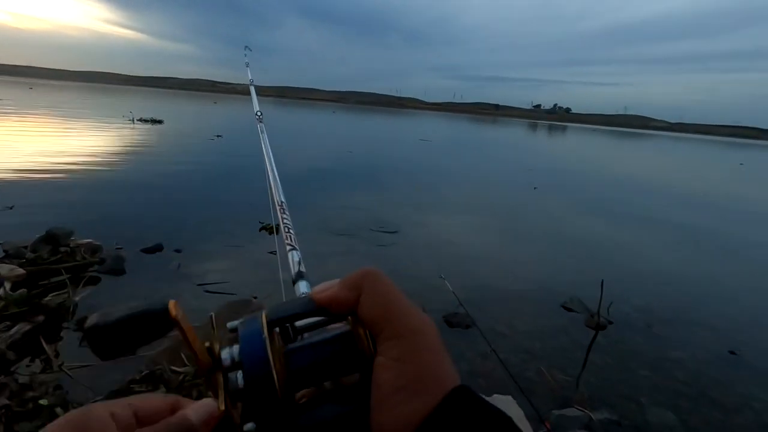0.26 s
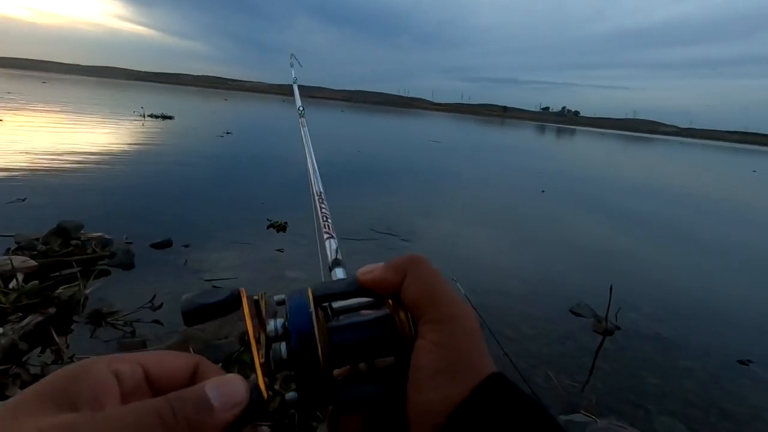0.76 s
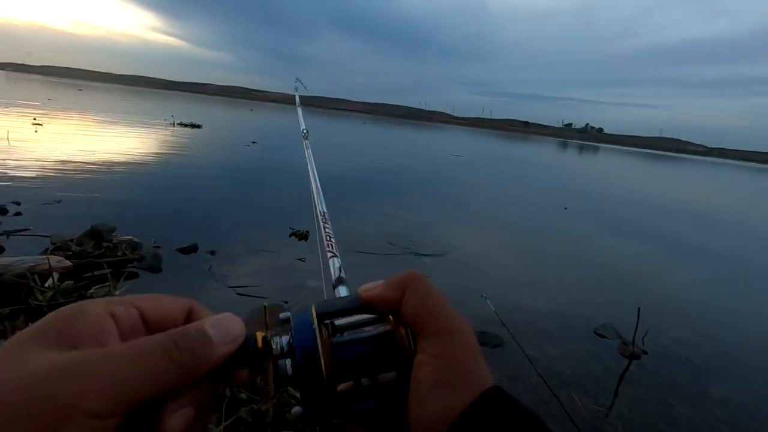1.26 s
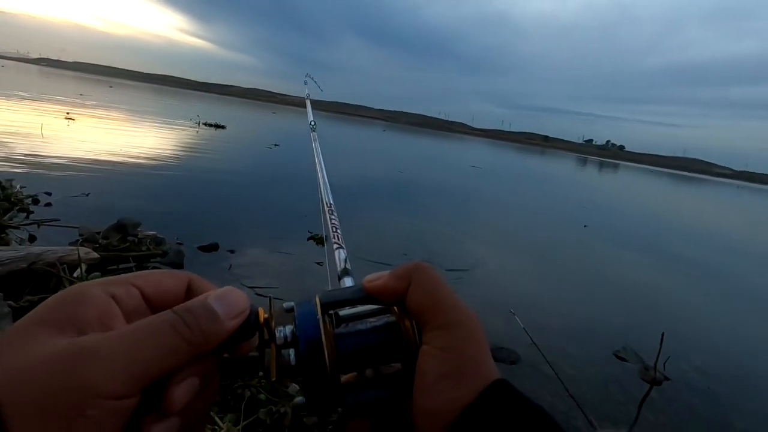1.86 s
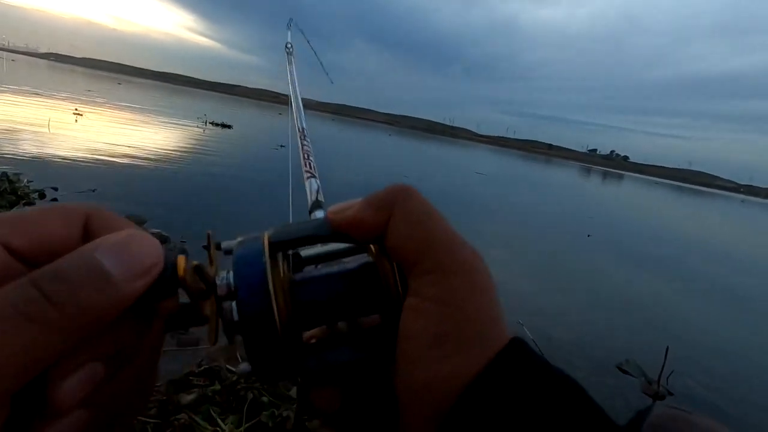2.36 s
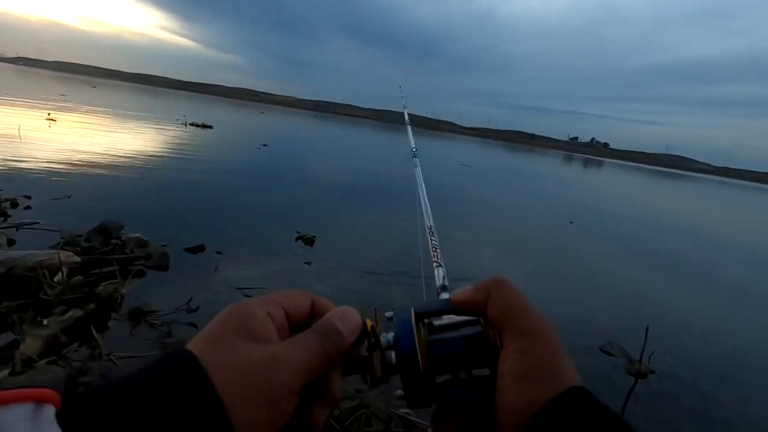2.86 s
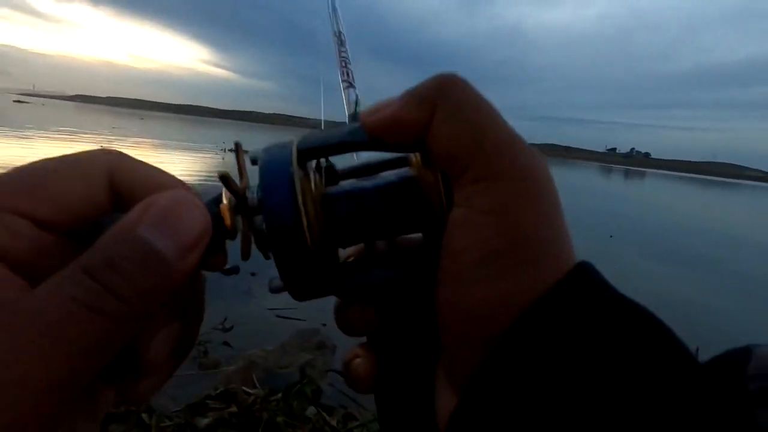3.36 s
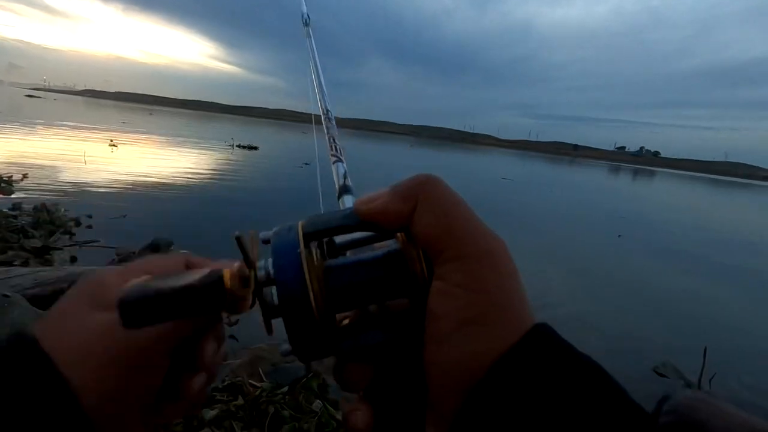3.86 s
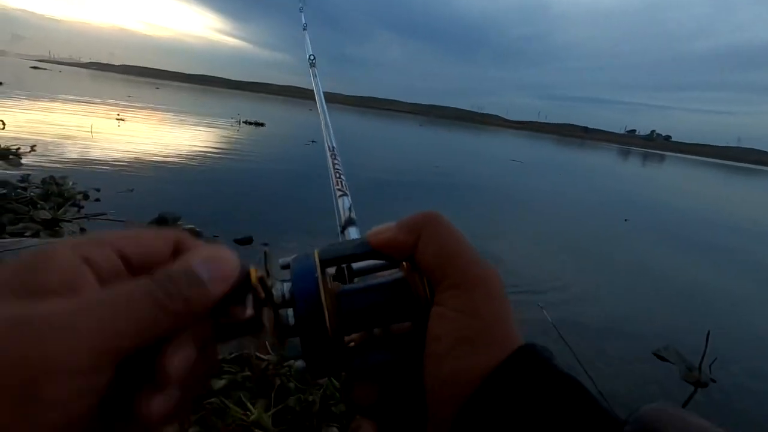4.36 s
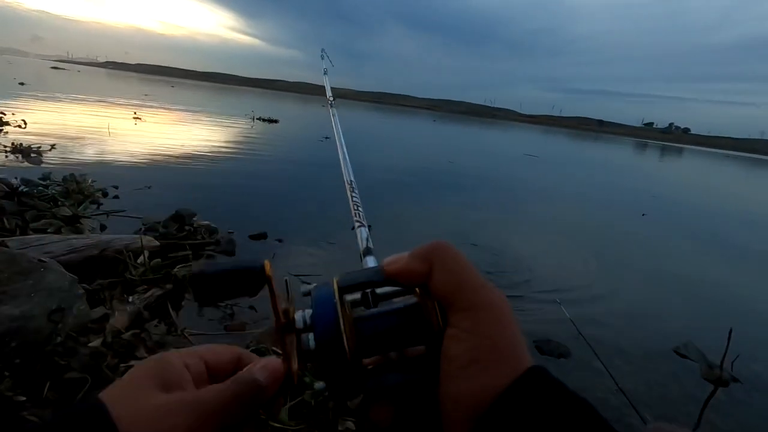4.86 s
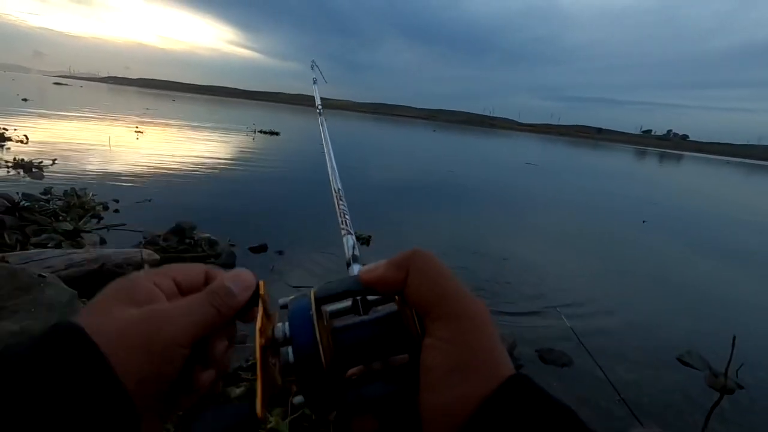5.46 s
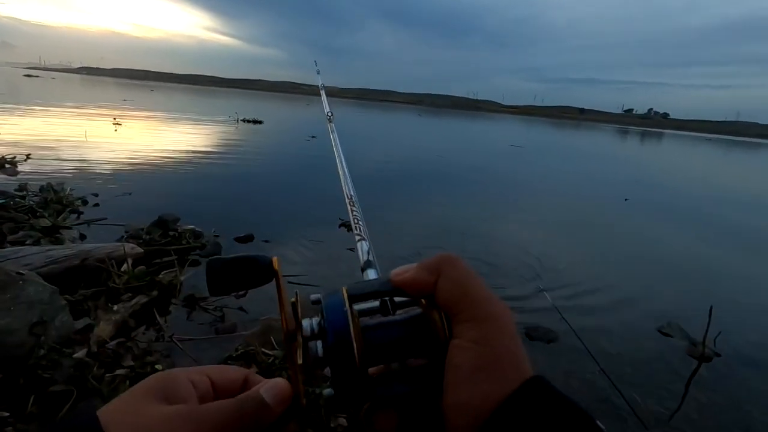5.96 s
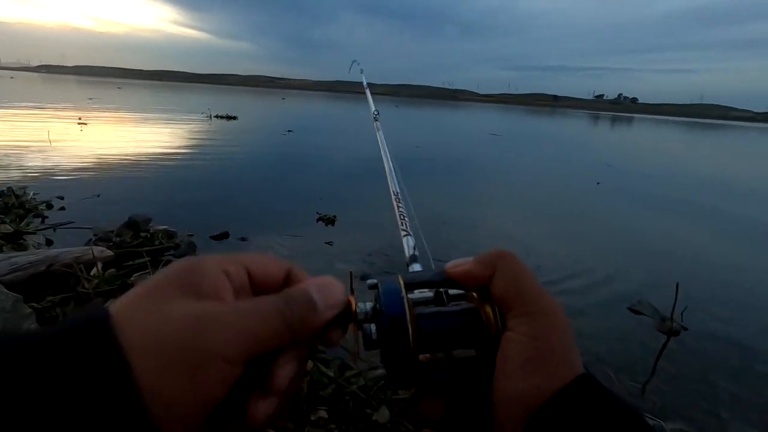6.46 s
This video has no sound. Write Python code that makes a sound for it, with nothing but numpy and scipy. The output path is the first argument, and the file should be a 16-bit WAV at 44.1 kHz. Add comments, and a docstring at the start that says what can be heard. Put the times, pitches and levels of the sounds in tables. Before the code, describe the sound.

Very close to the microphone, a fishing reel is cranked in short bursts, its metal clicker buzzing crisply with a faint gear whir. After two early turns and a short third, only stray clicks and hand knocks remain, then a cluster of fumbling knocks leads into quick repeated bursts. Far across open water an engine climbs through two gears and settles, over a low drone, soft wash and light wind buffeting.

```python
"""A baitcasting reel is cranked in short bursts on a calm lake shore, close to the microphone.
Its clicker pawl scrapes up each ratchet tooth and snaps off, singly when slow and as a buzz when fast,
ringing tuned reel modes and its own spring. Noise makes the gear whir, after-ring and sleeve rustle;
hands knock in short damped notes and creak in tiny slips. Far off, harmonics make an engine that pulls
through two gears and settles, two tones a drone, over air rumble and wash; a breeze buffets the mic."""
import sys
import numpy as np
from scipy import signal
from scipy.fft import rfft, irfft
from scipy.io import wavfile
from scipy.ndimage import uniform_filter1d, map_coordinates

SR = 44100
rng = np.random.default_rng(int(sys.argv[2]) if len(sys.argv) > 2 else 0)


def inscribe(sig):
    """Save sig as 16-bit PCM at rate SR to the path in sys.argv[1].

    A 1-D sig is mono; a 2-D sig holds one channel per row.
    Samples are clipped to [-1, 1] before scaling.
    """
    pcm = np.round(np.clip(np.atleast_2d(sig).T, -1, 1) * 32767)
    wavfile.write(sys.argv[1], SR, pcm.astype(np.int16))


N = 296352
TIME = np.arange(N) / SR

# spins of the crank: click level/dB, then rod ring, frame ring and top treble re click/dB,
# then the speed from first click to last as rows of (t/s, rate/teeth per s)
SPINS = [(-21, 2.3, 1, 1, [(.0116, 70), (.099, 68.6), (.274, 66.5), (.278, 61.5), (.41, 42.5)]),
         (-22, -2, 0, 0, [(.4784, 46), (.505, 66), (.535, 63), (.5977, 20)]),
         (-21.8, -.5, 2.5, -2, [(1.0806, 23.3), (1.144, 40.5), (1.186, 42.4), (1.2637, 15.4)]),
         (-19.5, 3, -1, 0, [(3.5785, 35.5), (3.681, 86), (3.739, 118), (3.839, 81), (3.8856, 44.6)]),
         (-20.3, 1.5, -1, 0, [(4.0676, 48), (4.098, 69.8), (4.152, 63.8), (4.294, 91.2), (4.367, 118.2),
         (4.45, 93.5), (4.5205, 24.8)]), (-20.8, 0, -2, 0, [(4.599, 45.6), (4.628, 79), (4.662, 70),
         (4.713, 121.5), (4.774, 55), (4.7986, 57)]), (-21, -2, 2, .5, [(4.8171, 73), (4.909, 56),
         (4.972, 70.6), (4.999, 59.4), (5.105, 86), (5.234, 73), (5.2957, 36.4)]),
         (-21, -3, -.5, 0, [(5.3625, 47), (5.44, 107.8), (5.489, 107.6), (5.533, 67.7), (5.609, 66.8),
         (5.6977, 41)]), (-21, .7, 2.2, -2, [(6.2371, 45.4), (6.343, 74), (6.377, 86.3), (6.457, 71.4),
         (6.5095, 29.4)])]
# single teeth slipping past while the crank creeps:
# t/s, click level/dB, then rod ring, frame ring and top treble re click/dB
LONE_CLICKS = [(0.448, -22.5, 3, 6, -6), (.647, -22, -4, 4.5, -7), (1.33, -25.5, 6, 6.5, 1),
               (1.533, -23.5, 4, -1, -4.5), (2.3094, -29, -5, 1.5, -1), (3.921, -21.5, -6, 2, 1.5),
               (3.982, -19.5, -5, -3, -1.5), (4.0368, -21, -1, 4, -3), (5.333, -21, 8, 3, -4),
               (5.7265, -19, 3, 1, -6), (5.766, -23, 3, 5.5, -0.5), (5.816, -22.5, 2, 1.5, 4.5),
               (5.9074, -21, -4, 0, 2), (6.2037, -22, -4.5, 4.5, -0.5), (6.5582, -25, 2, 7.5, 1),
               (6.627, -25.5, 5, 4.5, 1)]
# colour of skin scuffs and sleeve rustle: f/Hz, relative level/dB per Hz
CLOTH_COLOUR = [(1500, 16), (3500, 3), (6000, 2.5), (8000, -6.5), (10000, -21), (14000, -33)]

USUAL_TEETH_PER_S, WHEEL_TEETH = 66.4, 9
TREBLE_FROM_HZ = 8000   # modes above this change with each turn of the wheel


def from_db(db):
    """Decibels to gain."""
    return 10 ** (np.asarray(db) / 20)


def rms_one(x):
    """Scale to rms 1."""
    return x / np.sqrt(np.mean(x ** 2) + 1e-20)


def in_time(rows):
    """Each column of a curve at every sample."""
    s, *columns = np.transpose(rows)
    return [np.interp(TIME, s, c) for c in columns]


def at_hz(points, hz):
    """Read a spectrum on a log-frequency axis."""
    f, value = np.transpose(points)
    return np.interp(np.log(hz + 1), np.log(f), value)


def drift(rate):
    """Slow chance of spread 1, with the given number of random knots per second."""
    knots = rng.standard_normal(8000)
    return rms_one(map_coordinates(knots, [TIME * rate], order=3, mode="wrap"))


def tooth_by_tooth(shape, memory):
    """Chance of spread 1 that changes gradually from one tooth (first axis) to the next."""
    fresh = rng.standard_normal(shape)
    return np.sqrt(1 - memory ** 2) * signal.lfilter([1], [1, -memory], fresh, axis=0)


def noise(colour, size=N):
    """Stereo noise of a given colour and rms 1, alike in the bass and wide in the treble."""
    # left-right likeness: f/Hz, likeness 0-1
    likeness = [(25, 0.9), (45, 1), (70, 1), (130, 0.96), (300, 0.99), (700, 0.68), (1400, 0.5),
                (3000, 0.11), (7000, 0.046)]
    hz = np.fft.rfftfreq(size, 1 / SR)
    mid, side = rfft(rng.standard_normal((2, size)))
    alike = np.clip(at_hz(likeness, hz), 0, 1)
    both = np.sqrt(1 + alike) * mid + np.sqrt(1 - alike) * side * [[1], [-1]]
    return rms_one(irfft(both * from_db(at_hz(colour, hz)), size))


def resonator(hz, width_hz):
    """Filter coefficients of a two-pole resonance with gain about 1 on top."""
    r = np.exp(-np.pi * width_hz / SR)
    feed = np.array([1, 0, -1]) * (1 - r * r) / 2
    return feed, [1, -2 * r * np.cos(2 * np.pi * hz / SR), r * r]


def resonate(x, hz, width_hz):
    """Ring a signal through one fixed resonance."""
    return signal.lfilter(*resonator(hz, width_hz), x + 1e-18)


def retuned(x, times, pitches, width_hz):
    """A stereo resonance that takes a new pitch shortly before each click and rings on across the change."""
    state, parts = np.zeros((2, 2)), []
    cuts = ((times[1:] - .002) * SR).astype(int)
    for part, hz in zip(np.split(x + 1e-18, cuts, axis=1), pitches):
        rung, state = signal.lfilter(*resonator(hz, width_hz), part, zi=state)
        parts.append(rung)
    return np.hstack(parts)


def fade(x, t60):
    """Every impulse starts a dying envelope."""
    return signal.lfilter([1], [1, -from_db(-60 / (t60 * SR))], x + 1e-18)


def pan_gains(left_over_right_db):
    """Left and right gains, the level difference shared between them."""
    return from_db(left_over_right_db * np.array([[.5], [-.5]]))


def left_late(left, right, lag_s):
    """A stereo pair whose left side arrives a little later."""
    return np.array([np.interp(TIME - lag_s, TIME, left), right])


def engine(run, orders, waver_db):
    """Harmonics of the firing cycle, each fading in and out on its way over the water."""
    hz, db = in_time(run)
    jittered_hz = hz * (1 + .003 * drift(14))
    phase = 2 * np.pi * np.cumsum(jittered_hz) / SR
    lines = 0
    for order, level_db in orders:
        line = np.sin(round(order) * phase + 2 * np.pi * rng.random())
        lines = lines + from_db(level_db + waver_db * drift(7.1)) * line
    return from_db(db) * rms_one(lines)


def far_engine():
    """One engine's cycle rate climbs through two gears in turn, then holds a cruise."""
    # runs in first gear, second gear and cruise: t/s, cycle rate f/Hz, level/dB
    first_pull = [(0, 30, -35.5), (.2, 31.8, -34.5), (.5, 32.1, -29.5), (.62, 30.6, -32.5),
                  (.76, 31, -55.5), (1.05, 28.3, -44), (1.3, 30, -78.5)]
    second_pull = [(.9, 29.86, -84), (1.1, 30.73, -38), (1.35, 32.54, -39), (1.6, 34.5, -38),
                   (1.77, 35.92, -36.5), (2.02, 37.08, -31.5), (2.13, 38.4, -33.5), (2.25, 36.6, -42),
                   (2.6, 34.15, -68.5)]
    settled = [(0, 24.5, -55.5), (2.1, 23.2, -48), (2.4, 23.2, -45.5), (3.3, 23.4, -40), (4, 23.2, -46),
               (4.6, 23.3, -40.5), (5.1, 22.6, -40), (6.1, 22.1, -37), (6.72, 22.5, -36)]
    # harmonics for each run: multiple of the cycle rate, relative level/dB
    first_orders = [(3, 0), (4, -3.5), (5, -6), (6, -10), (7, -7.5), (8, -1.5), (9, -1), (10, 3),
                    (11, -13.5), (12, -1), (13, 0), (14, -24), (15, -8), (16, -23.5), (17, -13)]
    second_orders = [(2, -2.5), (3, 1), (4, -3.5), (5, 2), (6, -5.5), (7, -3), (8, -0.5), (9, -7), (10, -1),
                     (11, -8.5), (12, -5), (13, -8.5), (14, -11.5), (15, -9.5), (17, -15), (18, -17)]
    settled_orders = [(4, -19), (5, 6), (6, -3), (10, -21), (12, -14), (13, -16), (14, -10), (15, -11),
                      (17, -10.5), (20, -17), (22, -15.5)]
    pulling = engine(first_pull, first_orders, waver_db=2) + engine(second_pull, second_orders, waver_db=2.5)
    return pulling + engine(settled, settled_orders, waver_db=2.5)


def drone(waver_db, wander):
    """A far motor holds two low tones that waver in level and phase (wander in radians)."""
    # tones: f/Hz, rms level before the fade/dB
    motor_tones = [(71, -46), (142, -46)]
    # fade of both tones: t/s, gain/dB
    motor_fade = [(0, 5), (2.6, 6), (3.6, 3), (4.4, 1.5), (5.3, 0), (6.72, -3)]
    tones = 0
    for hz, db in motor_tones:
        tone = np.sin(2 * np.pi * hz * TIME + wander * drift(3.7))
        tones = tones + from_db(db + waver_db * drift(3.7)) * tone
    return np.sqrt(2) * tones * from_db(in_time(motor_fade)[0])


def open_air():
    """Two coloured noises with wavering levels: a low rumble of air and a far wash."""
    # colours: f/Hz, relative level/dB per Hz
    rumble_colour = [(15, -6.5), (30, -5.5), (48, 6.5), (75, 3.5), (130, -4.5), (200, -6), (350, -8.5),
                     (500, -16), (800, -69.5)]
    wash_colour = [(150, 4.5), (400, -3), (700, -2), (1200, -2), (1800, -8.5), (2400, -16), (3200, -27),
                   (5000, -32), (7500, -40.5), (10000, -56), (13000, -70.5)]
    # levels: t/s, level/dB
    rumble_level = [(0, -34), (1.2, -36), (2.05, -35), (3.3, -37), (4.3, -42), (5.6, -40.5), (6.72, -36.5)]
    wash_level = [(0, -38), (.9, -38), (1.55, -38), (2.1, -44), (2.8, -40.5), (4.5, -47), (5.1, -42.5),
                  (6.72, -44.5)]
    rumble = from_db(in_time(rumble_level)[0] + 1.3 * drift(9)) * noise(rumble_colour)
    wash = from_db(in_time(wash_level)[0] + 1.36 * drift(8.6)) * noise(wash_colour)
    return rumble + wash


def breeze(lumpy_db, lumps_per_s):
    """Gusts buffet each microphone port with low, lumpy noise of its own."""
    # gusts: t/s, level/dB
    gusts = [(0, -47.5), (.1, -39.5), (.2, -55.5), (.35, -44), (.62, -37), (.95, -44), (1.1, -35),
             (1.5, -49.5), (1.95, -44.5), (2.2, -50), (2.42, -44), (2.55, -62), (4.2, -56), (4.42, -42),
             (4.55, -56), (4.65, -41), (5.3, -48), (5.75, -37), (6.1, -46), (6.25, -58)]
    # buffeting colour: f/Hz, relative level/dB per Hz
    buffet_colour = [(12, -7), (25, 0.5), (50, 0.5), (75, -9), (110, -16), (200, -32.5), (500, -75)]
    ports = np.array([noise(buffet_colour)[0], noise(buffet_colour)[1]])
    return from_db(in_time(gusts)[0] + lumpy_db * drift(lumps_per_s)) * ports


def spin(speed):
    """Click times of one spin: its turning is shared out into a whole number of teeth."""
    s, rate = np.transpose(speed)
    t = np.arange(s[0], s[-1], 1 / SR)
    turned = np.cumsum(np.interp(t, s, rate)) / SR
    return np.interp(np.linspace(0, turned[-1], round(turned[-1]) + 1), turned, t)


def teeth(uneven_db):
    """Time and strength of every click, in spins or alone."""
    clicks = [(s, db) for s, db, *_ in LONE_CLICKS]
    for db, *_, speed in SPINS:
        clicks += [(s, db) for s in spin(speed)]
    times, db = np.transpose(sorted(map(tuple, clicks)))
    return times, from_db(db + uneven_db * rng.standard_normal(len(times)))


def crank_speed(times):
    """Teeth per second at every sample, from the gaps between clicks."""
    gap = np.diff(times)[np.clip(np.searchsorted(times, TIME) - 1, 0, len(times) - 2)]
    return uniform_filter1d(1 / gap, size=600)


def gears(times, level_db, growth, grain_db):
    """Gear whir swells with crank speed above a creep; its level is given at the usual speed."""
    # whir colour: f/Hz, relative level/dB per Hz
    whir_colour = [(400, -49), (650, -34), (850, -19.5), (1600, -3.5), (2600, -9.5), (3400, -1.5),
                   (4600, -8.5), (6000, -13), (10000, -14), (15000, -18)]
    creep = 6.1   # teeth per s; slower than this the gears are silent
    drive = np.maximum(crank_speed(times) - creep, 0) / (USUAL_TEETH_PER_S - creep)
    return from_db(level_db + grain_db * drift(140)) * drive ** growth * noise(whir_colour)


def scrapes(times, strengths):
    """The pawl drags up the flank of each tooth in a short swell that ends at the snap."""
    # scrape colour: f/Hz, relative level/dB per Hz
    scrape_colour = [(450, -39), (850, -7), (1500, -0.5), (2400, -11), (3300, -15), (4700, -19),
                     (7000, -19), (10000, -20), (14000, -24)]
    level, arch = np.zeros(N), np.sin(np.linspace(0, np.pi, int(.003 * SR)))   # 3 ms swell
    for s, strength in zip(times, strengths):
        snap = int(s * SR)
        level[snap - len(arch):snap] += strength * arch
    return from_db(-14.5) * level * noise(scrape_colour)


def wheel_angle(count):
    """Angle of the ratchet wheel at each click, from its dullest tooth."""
    dullest_tooth = 0.283
    return 2 * np.pi * (np.arange(count) - dullest_tooth) / WHEEL_TEETH


def ring_levels(times):
    """Rod, frame and top treble in dB, set by the grip; an untrue wheel dips and swells the treble each turn."""
    grips = [(s, *colour) for s, _, *colour in LONE_CLICKS]
    for _, *colour, speed in SPINS:
        grips += [(s, *colour) for s, _ in (speed[0], speed[-1])]
    rod_db, frame_db, treble_db = in_time(sorted(grips))
    wobble_db = -3 * np.cos(wheel_angle(len(times)))
    return rod_db, frame_db, treble_db + np.interp(TIME, times, wobble_db)


def contact(times, strengths, bounces, first_db, first_s):
    """Force of the pawl on each tooth: one hard touch and its bounces, its spectrum partly evened out."""
    size = bounces.shape[-1]
    lead = size // 4   # samples kept ahead of the touch for the evening filter
    force = np.roll(bounces, lead, axis=-1)
    force[..., lead + int(first_s * SR)] += from_db(first_db)
    spectrum = rfft(force)
    evenness = .3   # 0 leaves the spectrum, 1 flattens it
    force = irfft(spectrum / (rms_one(np.abs(spectrum)) + 1e-3) ** evenness)
    out = np.zeros((2, N + size))
    for start, strength, one in zip((times * SR).astype(int) - lead, strengths, force):
        out[:, start:start + size] += strength * one
    return out[:, :N]


def spring(times, strengths, pan_db, detune):
    """The pawl spring sings on; each tooth sounds its modes in a new mix, at its own tension and damping."""
    # spring modes at mean tension and damping: f/Hz, level re click/dB, t60/s
    spring_modes = [(3302, -16, 0.052), (3412, -13, 0.018), (4398, -20, 0.028), (6475, -27, .025),
                    (7387, -29, 0.028), (8513, -25.5, 0.026), (9910, -24.5, 0.023), (12682, -29.5, .035)]
    out, age = np.zeros(N + SR), TIME[:SR // 12]
    # a creeping crank excites the spring less than a spin
    slowness = np.clip(1 - 1 / (np.gradient(times) * USUAL_TEETH_PER_S), 0, 1)
    strengths = strengths * from_db(-2 * slowness)
    chances = rng.standard_normal((len(times), 2 + len(spring_modes)))
    for s, strength, (tighter, freer, *louder) in zip(times, strengths, chances):
        decay_db = 60 * age * np.exp(-.15 * freer)
        note = 0
        for (hz, db, t60), more in zip(spring_modes, louder):
            tone = np.sin(2 * np.pi * hz * (1 + detune * tighter) * age)
            note = note + from_db(db + 2.8 * more - decay_db / t60) * tone
        start = int(s * SR)
        out[start:start + len(age)] += strength * note
    return out[:N] * pan_gains(pan_db)


def clicker(times, strengths, land_db, thud_db, chatter_db, chatter_t60, land_s, apart, left_lag_s, lag_turns):
    """The pawl snaps off a tooth, lands and chatters briefly, ringing the reel and its own spring."""
    # reel frame and pawl modes at rest: f/Hz, width/Hz, level/dB, left over right/dB
    reel_modes = [(920, 144, 5, 1.5), (1103, 75, 8, -2), (1477, 210, 7.5, 0.5), (1990, 470, -1.5, -3.5),
                  (2320, 100, 1, 1.5), (3197, 150, -5.5, -11), (3370, 130, -2.5, -1.5),
                  (3730, 300, 3.5, 1.5), (4710, 290, 4.5, -2), (5400, 2300, -4, 4.5), (6480, 150, -1, 1),
                  (7120, 870, -7.5, 7), (8520, 406, -3, -12), (9944, 520, 5.5, -4), (12660, 300, -10, -15),
                  (12500, 1700, -13.5, -14.5)]
    snaps, count = np.zeros(N), len(times)
    snaps[(times * SR).astype(int)] = strengths
    # tiny dying bounces of either sign, in a pattern half kept from the tooth before
    age = TIME[:512] - land_s
    signs = np.sign(tooth_by_tooth((count, 3, len(age)), memory=.5))
    bounce_signs = signs[:, :1] + apart * signs[:, 1:]   # one shared pattern, one for each side
    chatter = (age >= 0) * from_db(chatter_db - 60 * age / chatter_t60) * bounce_signs
    # the heavy frame answers the whole blow, the light pawl its every bounce
    blow = contact(times, strengths, 0.5 * chatter, thud_db, 0)
    rattle = contact(times, strengths, chatter, land_db, land_s)
    rod, frame, treble = from_db(ring_levels(times))
    drives = [blow * rod, blow * frame, rattle, rattle * treble]
    # the top modes bend once a turn, one tooth ahead of the treble swell
    bend = -.011 * np.cos(wheel_angle(count) + 2 * np.pi / WHEEL_TEETH)
    # the snap itself goes straight through the air
    crack = resonate(snaps, 4700, 2950)
    out = from_db(19.3) * pan_gains(-3) * left_late(crack, crack, left_lag_s)
    out = out + spring(times, strengths, pan_db=-13.0, detune=.003)
    for k, (hz, width_hz, db, pan_db) in enumerate(reel_modes):
        drive = drives[np.searchsorted([1300, 3200, TREBLE_FROM_HZ], hz)]   # tops of rod, frame, pawl in Hz
        # the shifting grip drifts each mode in level, and those below the treble in pitch
        louder, higher = tooth_by_tooth((count, 2), memory=.8).T
        pitches = hz * (1 + (bend if hz > TREBLE_FROM_HZ else .015 * higher))
        colour = np.interp(TIME, times, from_db(1.6 * louder))
        rung = retuned(drive * colour, times, pitches, width_hz)
        left, right = (-1) ** k * from_db(db) * pan_gains(pan_db) * rung   # polarity alternates
        # each mode reaches the left port a small part of a cycle later
        out = out + left_late(left, right, min(left_lag_s, lag_turns / hz))
    return out


def after_ring(times, strengths, level_db, t60, grain_db):
    """Loose parts of reel and rod carry each click on as a grainy tail."""
    # dense ring of reel and rod: f/Hz, relative level/dB per Hz
    tail_colour = [(400, -35.5), (900, 6), (1600, 7), (2700, -6), (4500, -4.5), (7000, -7), (10000, -7.5),
                   (12000, -19.5), (16000, -31)]
    energy = np.zeros(N)
    energy[(times * SR).astype(int)] = strengths ** 2
    envelope = np.sqrt(fade(energy, t60 / 2))   # energy dies twice as fast in dB as its root
    return from_db(level_db + grain_db * drift(600)) * envelope * noise(tail_colour)


def knocks(scuff_t60, spread):
    """Each touch is a short damped note, a broad thud around it and a scuff of skin on top."""
    # hands knocking and ticking on rod and crank:
    # t/s, level/dB, ring f/Hz, thud against clear note 0-1, scuff re half the touch level/dB
    touches = [(.783, -35, 2370, 0.35, -13), (1.247, -32.5, 2450, 0.4, 6), (2.311, -21, 1810, 0.6, -8),
               (2.828, -45.5, 4260, .8, -6), (3.039, -34.5, 3660, 1, 3.5), (3.057, -24, 62, 0, -31),
               (3.059, -30, 4430, 0.75, -12), (3.186, -32, 4200, 0.5, -16), (3.194, -20, 1530, 0.2, -19),
               (3.208, -34, 1950, .3, -23), (3.211, -32.5, 2660, 0.3, -20), (3.215, -25, 1410, 0, -28),
               (3.225, -31, 1040, 0.8, -23), (3.232, -32, 840, 0.5, -16), (3.24, -31, 1410, .8, -23),
               (3.246, -23.5, 685, 0.15, -22), (3.26, -34, 2050, .7, -7), (3.292, -28, 487, 0.46, -23),
               (3.298, -35, 2030, 0.1, -15), (3.294, -34, 4350, .2, -14), (3.3, -31, 5750, 0, -12),
               (3.327, -33, 3900, .8, -14), (3.334, -28, 335, 1, -18), (3.335, -27.5, 670, 1, -20),
               (3.334, -17.5, 1450, 0.54, -19), (3.336, -25, 2800, 0.6, -15),
               (3.348, -29.5, 2050, 0.4, -13), (3.396, -43, 5070, .1, -8), (3.453, -35, 6050, 0.36, -2),
               (3.539, -22, 1130, 0.2, -6.5), (3.547, -20, 1880, 0.05, -9), (4.005, -33, 4700, .4, -10),
               (4.016, -17.5, 1570, 0.44, -11), (4.543, -34, 2284, 0.9, -14), (5.323, -23, 1100, 0.45, -20),
               (5.355, -24, 1090, 0.5, -14), (5.839, -34.5, 1890, 0.3, 0), (5.938, -38, 3600, 0.9, 7),
               (6.032, -48, 3205, 0.6, 3), (6.074, -42, 4830, 0.3, -14), (6.121, -45, 2400, 0.5, -1),
               (6.192, -43, 2200, 0.7, -6)]
    out, scuff, age = np.zeros((2, N)), noise(CLOTH_COLOUR), TIME[:SR // 8]
    attack = 1 - np.exp(-age / 0.0008)   # skin softens the contact
    for s, db, hz, dull, scuff_db in touches:
        start, dull = int(s * SR), np.clip(dull, 0, 1)
        span = slice(start, start + len(age))
        t60 = 0.028 * (1000 / hz) ** 0.67   # 28 ms at 1 kHz, shorter with rising pitch
        grit = resonate(rng.standard_normal(len(age)), hz, spread * hz)
        thud = rms_one(resonate(grit, hz, spread * hz))
        clear = np.sin(2 * np.pi * hz * age)
        note = ((1 - dull) * clear + dull * thud) * from_db(-60 * age / t60)
        rub = scuff[:, span] * from_db(scuff_db - 60 * age / scuff_t60) / 2
        out[:, span] += from_db(db) * (note + rub) * attack
    return out


def sleeve(catches_per_s):
    """As the grip shifts, each rub swells and dies in one arch, the cloth catching as it slides."""
    # sleeve rubs: start t/s, length/s, level/dB, roughness/dB
    rubs = [(1.77, 0.52, -50, 1.2), (2.345, 0.55, -60, 1.5), (2.79, .07, -64, 2), (3.154, 0.35, -52.5, 2),
            (5.907, 0.13, -51, 3), (6.03, .19, -75, 6)]
    catching = drift(catches_per_s)
    level = 0
    for s, length, db, rough_db in rubs:
        arch = np.sin(np.pi * np.clip((TIME - s) / length, 0, 1))
        level = level + from_db(db + rough_db * catching) * arch
    return level * noise(CLOTH_COLOUR)


def creaks(spread_db, count=16):
    """Skin sticks and slips on the grip; each slip rings briefly at one of a set of pitches."""
    # fingers creaking over the grip: start t/s, length/s, rate/slips per s, level/dB
    grip_creaks = [(3.17, 0.16, 260, -43), (3.324, .03, 600, -36), (3.997, .035, 330, -34)]
    slips = []
    for s, length, rate, db in grip_creaks:
        for u, v, w, pitch in rng.random((200, 4))[:int(rate * length)]:
            slips.append((s + length * u, db + spread_db * (v - w), pitch))
    slips = np.array(slips)
    out = np.zeros(N)
    for k, hz in enumerate(np.geomspace(560, 6500, count)):
        s, db, _ = slips[(slips[:, 2] * count).astype(int) == k].T
        width_hz = np.log(1000) / np.pi * hz / 17   # t60 of 17 cycles
        taps = np.zeros(N)
        taps[(s * SR).astype(int)] = from_db(db - 4 * np.log2(hz / 1000))   # falls 4 dB per octave
        out += resonate(taps, hz, width_hz) * SR / (2 * np.pi * width_hz)
    # the slips carry little treble above 6 kHz
    return signal.sosfilt(signal.butter(4, 6000, fs=SR, output="sos"), out)


def scene():
    """The reel in the hands, before the far shore."""
    far_shore = far_engine() + drone(waver_db=2.4, wander=0.81) + open_air()
    wind = breeze(lumpy_db=2.5, lumps_per_s=13)
    times, strengths = teeth(uneven_db=1.1)
    reel = gears(times, level_db=-41.0, growth=1.22, grain_db=4.0) + scrapes(times, strengths)
    reel = reel + clicker(times, strengths, land_db=15.5, thud_db=20.0, chatter_db=10.0, chatter_t60=.0034,
                          land_s=.0003, apart=0.47, left_lag_s=.00005, lag_turns=0.14)
    reel = reel + after_ring(times, strengths, level_db=-19.8, t60=0.12, grain_db=3)
    hands = knocks(scuff_t60=0.083, spread=0.52) + sleeve(catches_per_s=84) + creaks(spread_db=7)
    return far_shore + wind + reel + hands


def record(dry):
    """The microphone rolls off in the top octave, then the band ends."""
    soft = signal.sosfilt(signal.butter(10, 14000, fs=SR, output="sos"), dry)
    return signal.sosfilt(signal.ellip(10, .1, 80, 16500, fs=SR, output="sos"), soft)


dry = scene()
out = record(dry)
inscribe(out)
```